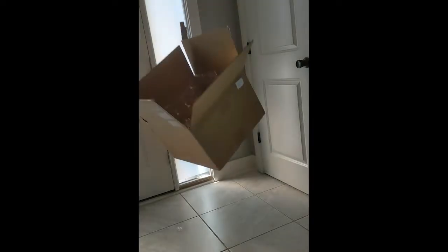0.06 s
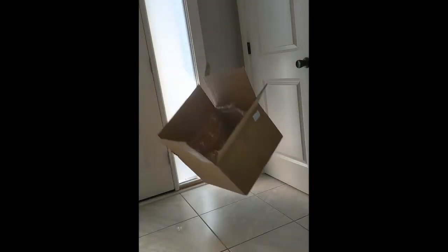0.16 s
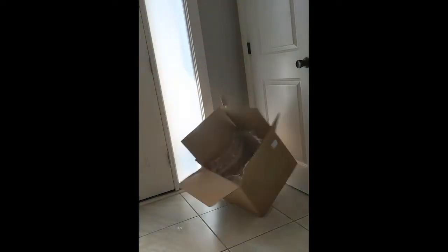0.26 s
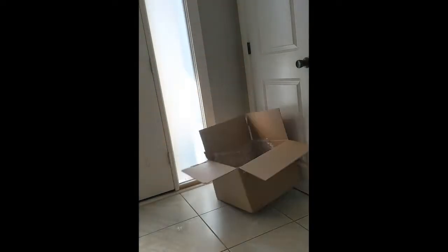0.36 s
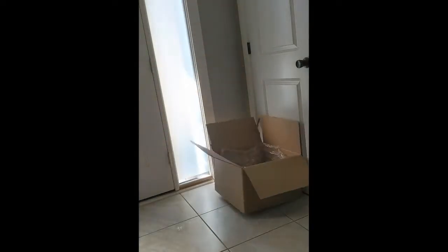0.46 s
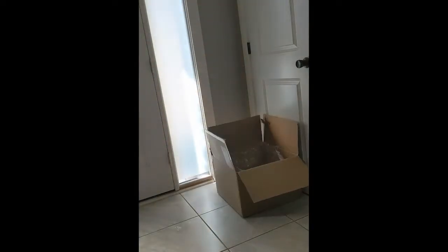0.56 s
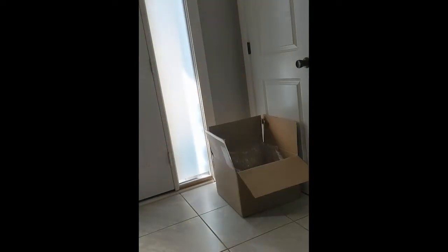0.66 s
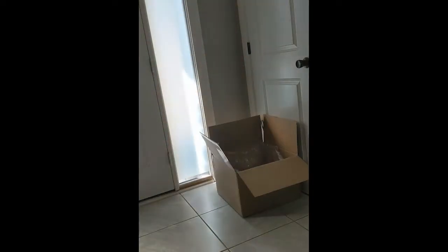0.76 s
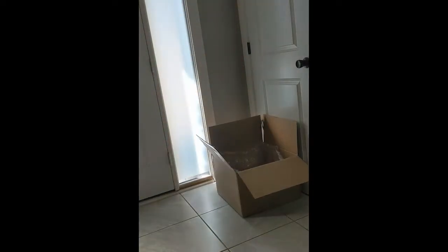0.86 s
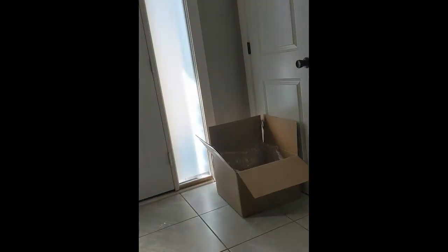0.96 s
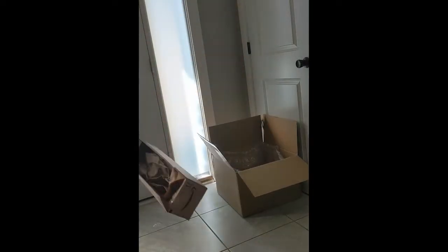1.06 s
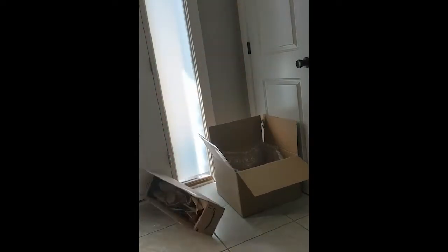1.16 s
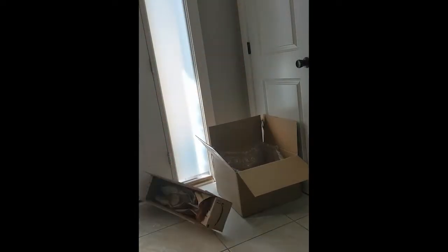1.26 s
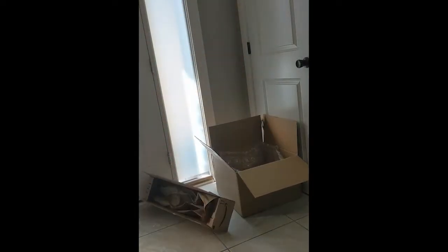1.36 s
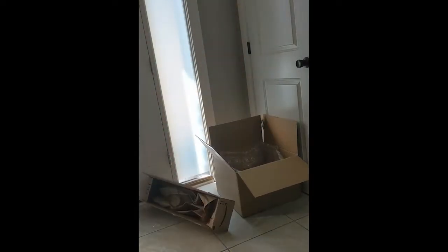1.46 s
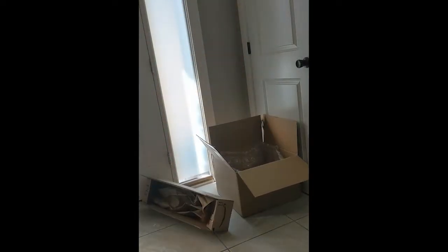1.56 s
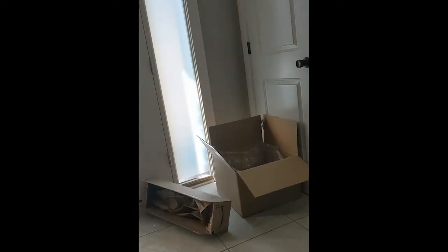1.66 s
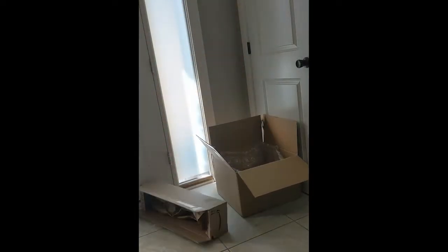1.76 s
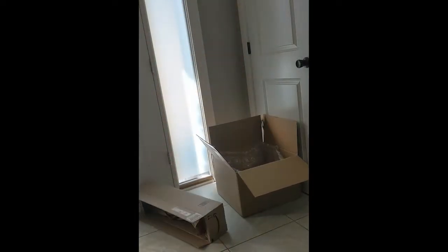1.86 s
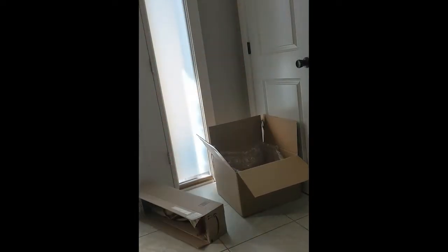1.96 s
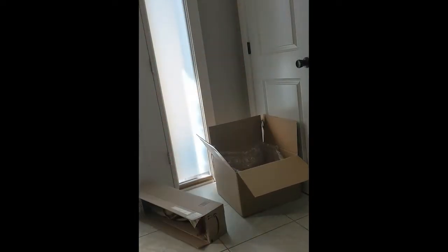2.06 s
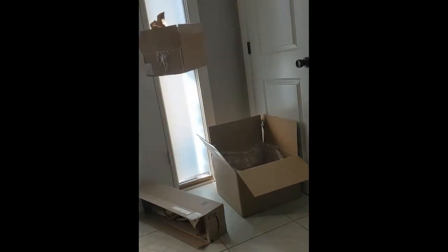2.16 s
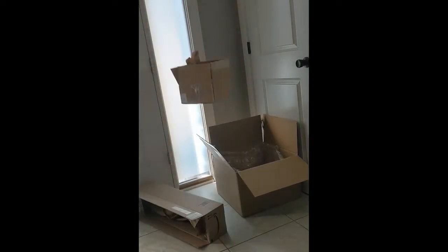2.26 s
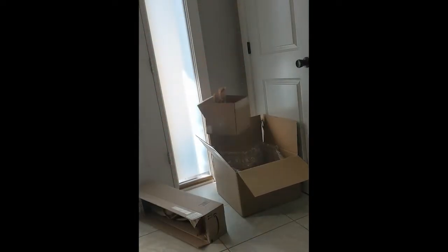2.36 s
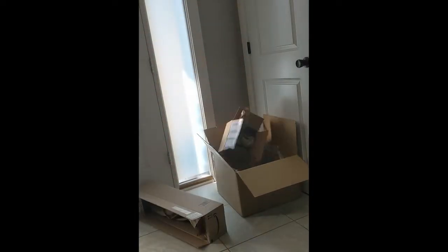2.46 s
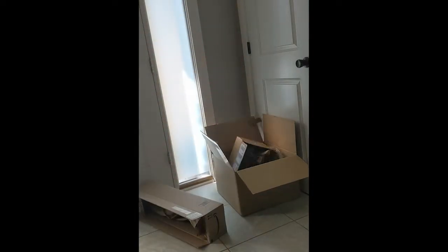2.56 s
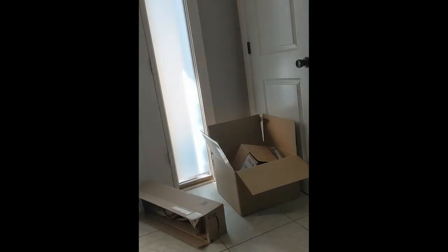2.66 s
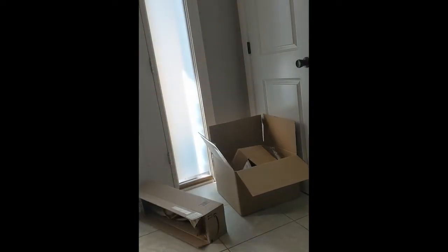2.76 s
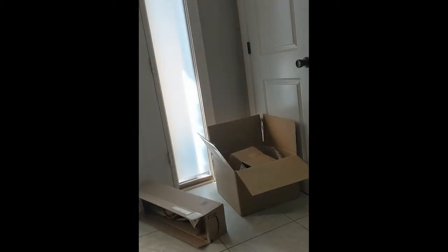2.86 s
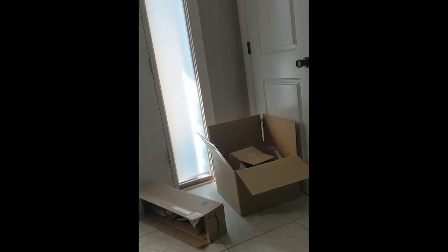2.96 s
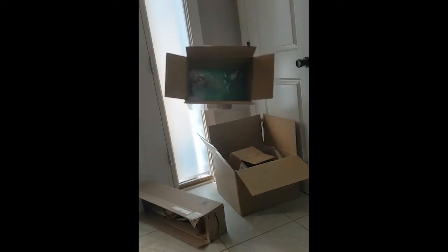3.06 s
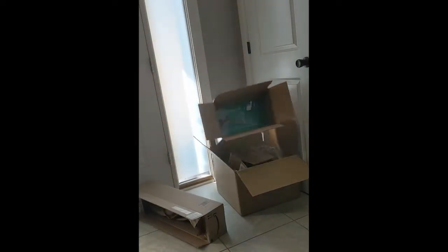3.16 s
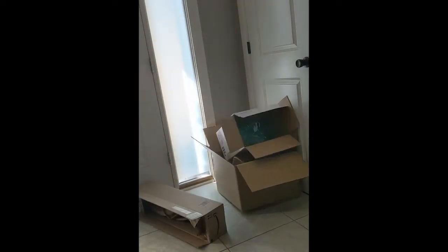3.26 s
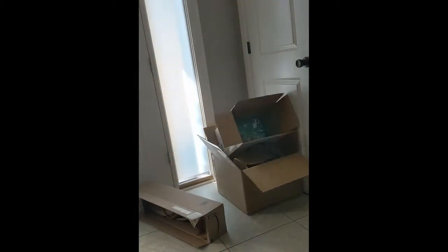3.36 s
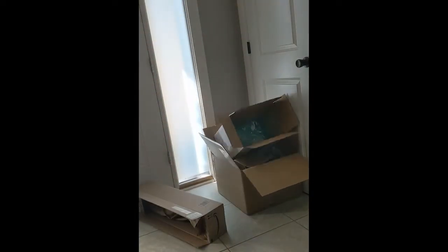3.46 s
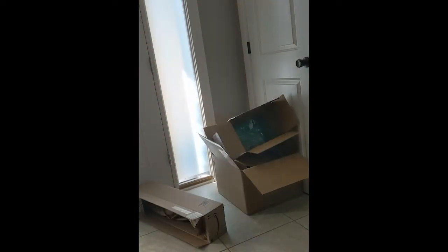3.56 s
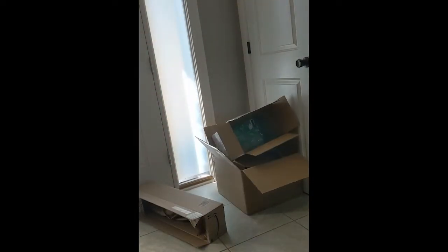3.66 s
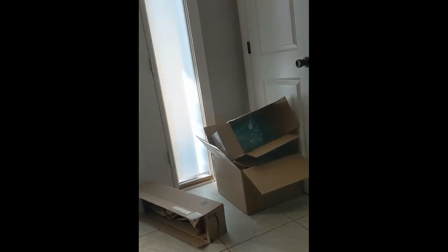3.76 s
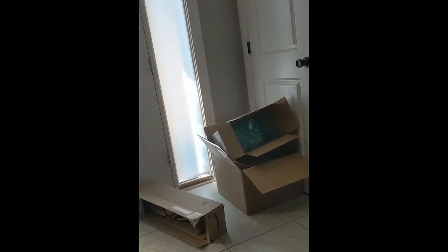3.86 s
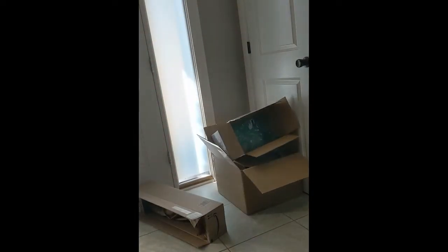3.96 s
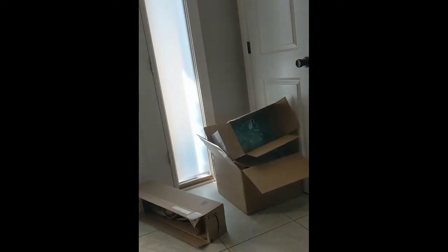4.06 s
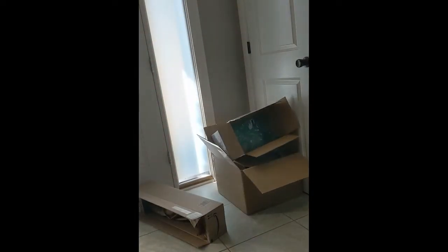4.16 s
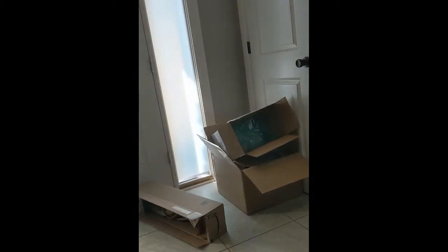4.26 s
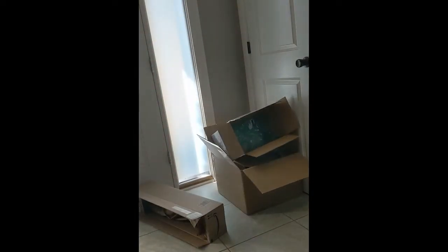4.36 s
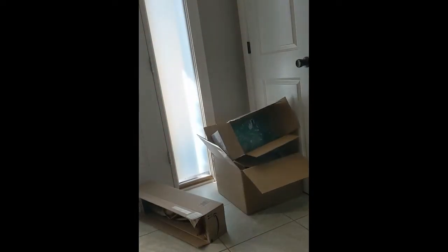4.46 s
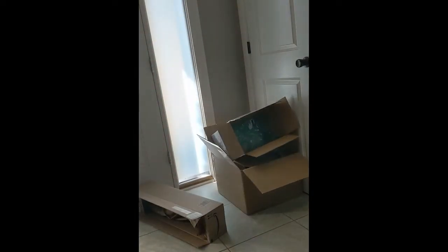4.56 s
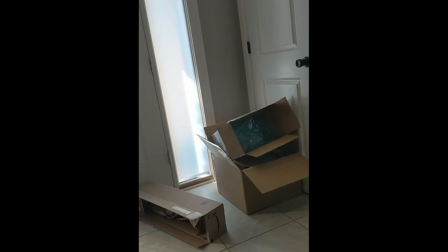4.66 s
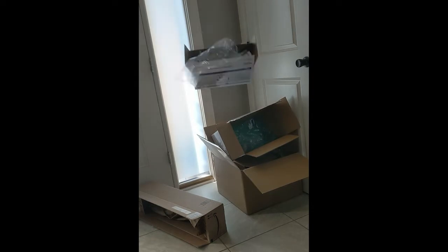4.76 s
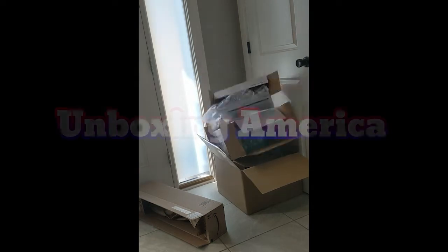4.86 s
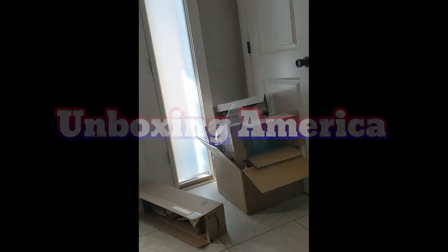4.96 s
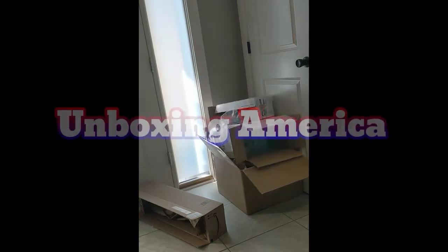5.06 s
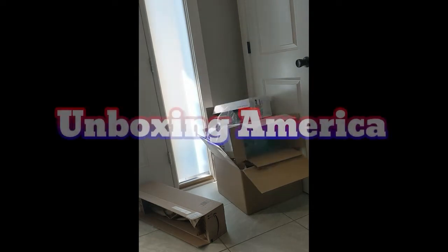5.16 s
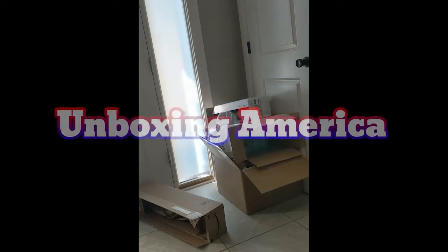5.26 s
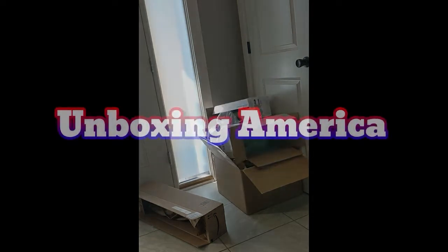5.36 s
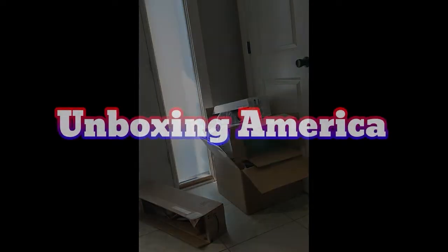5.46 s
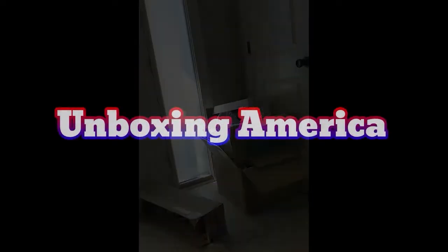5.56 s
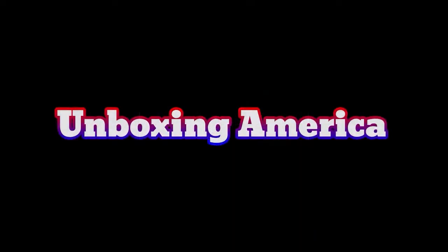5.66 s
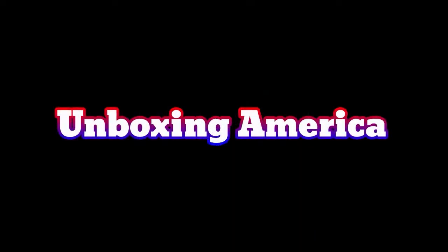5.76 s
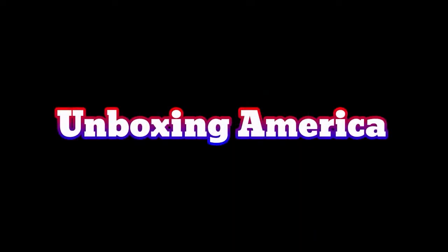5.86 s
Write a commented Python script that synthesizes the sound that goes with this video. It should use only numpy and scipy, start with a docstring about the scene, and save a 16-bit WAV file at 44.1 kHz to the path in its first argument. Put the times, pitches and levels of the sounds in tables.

```python
"""Cardboard boxes thrown in a bare hallway

Boxes land one after another on a tiled floor beside a door. Decaying sines ring the panels; shaped
grains and noise boom, crunch and rustle; paired low modes shudder the door; stiff film peels and rips.
Noise echoes follow. At section ends the rumble and hiss step and echoes stop; the end is near silent."""
import sys
import numpy as np
from scipy import signal
from scipy.fft import rfft, irfft, next_fast_len
from scipy.io import wavfile
from scipy.ndimage import uniform_filter1d, minimum_filter1d

SR = 44100
rng = np.random.default_rng(int(sys.argv[2]) if len(sys.argv) > 2 else 0)


def pcm_store(signal):
    """Save signal as 16-bit PCM."""
    levels = np.round(np.clip(np.atleast_2d(signal), -1, 1) * 32767)
    wavfile.write(sys.argv[1], SR, levels.astype(np.int16).T)


def level_to_linear(level):
    """Convert decibel levels to linear amplitude factors, elementwise."""
    exponent = np.asarray(level, float) / 20
    return 10 ** exponent


N = 260542

# Levels in the tables are relative, ahead of the mix. # Corners and faces meeting the floor; the 110 Hz row at
# 0.33 s is the air inside the big box booming. # Each row: start in seconds, ring level in dB, pitch in Hz
# (panel pitch, or air pitch for that row), # T60 at that pitch in seconds, crack level in dB.
BLOWS = [(0.329, -4.5, 233, 0.15, -5.5), (0.33, -5.5, 110, 0.24, -30), (0.342, -3, 225, 0.1, -9.5),
         (.556, -9.5, 283, 0.07, -15), (.565, -12, 157.5, .1, -24), (1.2447, -8.5, 260.4, .08, -17),
         (1.254, -8, 583, 0.2, -3.5), (1.279, -8.5, 433, 0.14, -7.5), (1.306, -8, 686, 0.06, -16.5),
         (1.342, -14.5, 616, 0.36, -15.5), (1.39, -17.5, 649, 0.35, -20), (1.953, -25.5, 228, 0.2, -38.5),
         (2.4633, -5.5, 403, 0.14, -9.5), (2.538, 0, 282, 0.1, -7.5), (2.549, -6, 273, .13, -26),
         (2.755, -24, 517, 0.14, -16.5), (3.285, -15.5, 253, 0.23, -29), (3.304, -2.5, 237.5, 0.12, -9.5),
         (3.342, -14, 301.5, 0.19, -1), (4.9059, -6.5, 242.6, 0.11, -26.5), (4.9516, -5, 1094, 0.052, -6),
         (4.961, -6.5, 337, 0.29, -13), (5.03, -13.5, 308, 0.32, -19)]
# Panel modes. Each row: multiple of the panel pitch, level in dB.
PANEL_MODES = [(0.471, -14.5), (1, -2), (1.449, -20.5), (2.199, -14)]
# A box lands, rocks or settles. Each row: start in seconds, crunch level in dB, boom against crunch in dB,
# hold in seconds, crunch T60 in seconds.
JOLTS = [(0.326, -17.5, 2.5, 0.0098, 0.57), (0.549, -32, 7, 0.02, 0.43), (1.241, -12.5, -6.5, 0.052, .6),
         (1.901, -38.5, 1.5, 0.032, 0.45), (2.031, -52.5, 11.5, 0.0145, 0.36),
         (2.463, -23, 4.5, 0.019, 0.27), (2.544, -23.5, 4, 0.013, 0.37), (2.746, -39, -2.5, 0.023, 0.63),
         (3.3, -21, 6, 0.024, 0.251), (3.328, -20, -3.5, .025, .43), (4.162, -35, -7.5, 0.039, 0.27),
         (4.907, -26.5, 6.5, 0.034, 0.51), (4.951, -14.5, -4.5, 0.02, 0.26), (5.061, -33, -3, 0.015, 1)]
# Packing and flaps stir. Each row: start in seconds, hold in seconds, level in dB, T60 in seconds.
STIRS = [(0, 0.1, -59, 0.2), (0.177, 0.011, -58, 0.11), (0.326, 0.0052, -23.5, 0.52),
         (0.434, 0.24, -45, 0.4), (1.243, 0.054, -22.5, 0.43), (1.89, 0.059, -45.5, 0.54),
         (2.463, 0.019, -33, 0.38), (2.552, 0.03, -35.5, 0.42), (2.673, 0.27, -51, 0.46),
         (3.294, 0.033, -29, 0.24), (3.334, 0.027, -25.5, 0.39), (3.678, 0.026, -52, 0.51),
         (3.848, .04, -60, .4), (4.903, 0.057, -36, 0.45), (4.948, .12, -33.5, 0.4),
         (5.245, 0.028, -50, 0.29)]
# Spectra of panel boom, corrugation crunch and packing rustle. Each row: frequency in Hz, gain in dB.
BOOM_GAIN_DB = [(90, -7), (201, 2), (348, -4), (500, -5), (650, -33), (1100, -120)]
CRUNCH_GAIN_DB = [(160, -10), (280, -3.5), (642, -1), (959, -4), (1240, -9.5), (1620, -12.5), (1980, -20),
                  (2600, -17), (3380, -32.5), (5720, -120)]
RUSTLE_GAIN_DB = [(1000, -20.5), (1700, -5), (2080, -10), (3250, -5), (11600, -16), (15400, -17),
                  (16500, -69.5)]
# Place of the sound and crispness of its packing. Each row: start in seconds, left minus right in dB,
# treble lift in dB.
PLACES = [(0, 0.5, 3), (1.099, 0.5, -7), (1.85, 1, -1), (2.399, 1, 5), (3.2, 0.5, 1), (3.955, -4, -3.5),
          (4.248, -0.5, -2), (4.68, -7.5, 2), (4.85, 1, 1.5)]
# Stiff film peeled gently, then in one rip. Each row: time in seconds, pull in dB, treble lift in dB.
PULL = [(3.961, -76, 10), (4.012, -54, 2), (4.076, -35.5, 4), (4.16, -35.5, 4.5), (4.214, -32, 0.5),
        (4.25, -35, 6), (4.252, -16.5, 5), (4.31, -8, 1.5), (4.341, -14, -1), (4.417, -16.5, 0.5),
        (4.435, -33.5, -11), (4.52, -49, -17), (4.68, -61, -3), (4.71, -57, 5.5), (4.785, -47.5, 1.5)]
# Spectrum of the cardboard under the film. Each row: frequency in Hz, gain in dB.
PEELED_BOARD_GAIN_DB = [(200, -4.5), (1000, 0.5), (1700, -8), (2500, -8), (4000, -30), (8000, -77)]
# Snaps of film letting go. Each row: start in seconds, level in dB.
SNAPS = [(4.015, -32.5), (4.027, -27), (4.047, -30.5), (4.064, -25), (4.1524, -24.5), (4.1585, -21.5),
         (4.1686, -15), (4.1758, -16), (4.1789, -15.5), (4.198, -11), (4.214, -16.5), (4.218, -13),
         (4.268, -4), (4.738, -33)]
# Stretched film sings. Each row: start in seconds, hold in seconds, pitch in Hz, level in dB.
SQUEALS = [(4.263, .024, 5560, -21.5), (4.327, 0.029, 3290, -21.5)]
# A flap rubs on the box. Each row: start in seconds, hold in seconds, level in dB.
CREAKS = [(3.686, .036, -46.5), (3.861, .035, -53.5)]
# Flap resonances. Each row: frequency in Hz, width in Hz, level in dB.
CREAK_TONES = [(467, 110, 3), (881, 58, 2.5), (1717, 71, -7)]
# Air and floor shocks reaching the door. Each row: start in seconds, leaf level in dB, side pane level in dB.
SHOVES = [(0.374, -17.5, -22.5), (1.252, -37, -49), (2.531, -36, -26.5), (3.304, -21.5, -26.5),
          (4.971, -20, -22.5)]
# Door modes. Each row: frequency in Hz, T60 in seconds, part (0 leaf, 1 side pane).
DOOR_MODES = [(28.5, 1.21, 0), (31.4, 0.85, 0), (58, 0.15, 1), (64.6, 0.85, 1), (44, 0.45, 1)]
# Hall decay. Each row: frequency in Hz, T60 in seconds.
HALL_T60_S = [(30, 2), (79, 0.77), (210, 0.48), (550, 0.64), (3840, 0.6), (10100, 0.49)]
# Likeness of left and right in hall and background. Each row: frequency in Hz, likeness from 0 to 1.
LIKENESS = [(60, 1), (250, 0.65), (600, 0.77), (3000, 0.029)]
# Sections of steady background. Each row: end in seconds, rumble level in dB, hiss level in dB.
SECTIONS = [(1.049, -57, -58), (2.205, -65, -64.5), (3.1, -55.5, -55), (3.952, -69.5, -63),
            (4.786, -61.5, -59), (5.519, -67, -56), (5.91, -101, -125)]
# Background spectrum. Each row: frequency in Hz, gain in dB.
BACKGROUND_GAIN_DB = [(12, -29), (20, -0.5), (53, -11.5), (244, -13), (1950, -25), (9410, -33),
                      (15200, -43.5), (16500, -60.5)]
# Level of the whole mix, lowered over the last throw. Each row: time in seconds, gain in dB.
FADE = [(5.101, -1), (5.52, -11)]
# Unequal microphones. Each row: frequency in Hz, left minus right in dB.
LEAN_DB = [(200, 1.5), (700, 6.5), (1200, -1.5), (9000, -1.5), (13000, 0.5)]
# Housing resonances round the microphones. Each row: frequency in Hz, width in Hz, lift in dB.
HOUSING = [(1580, 280, 5), (3570, 1600, 4.5), (5694, 370, 7.5), (7560, 430, 8), (9575, 700, 7.5),
           (11490, 140, 9)]

SHEEN_HZ, FILM_CUT_HZ, RUMBLE_HZ = 4770, 3320, 100
JOLT_RISE_S, STIR_RISE_S = 0.0011, 0.0034
JOLT_BLOOM, STIR_BLOOM = 0.17, 0.15   # rise time added, as a share of the hold
BOOM_T60_SHARE = 0.89   # of the crunch T60
RIP_S, SLIPS_PER_S, SLIP_DEPTH_DB, SLIP_WANDER_RAD = 4.2525, 126, 2, 0.031   # wander: random step per sample
PEEL_BOARD_DB, SNAP_BRIGHT_DB = -9, 3
CREAK_T60_S, SQUEAL_T60_S, SQUEAL_WIDTH_HZ = 0.36, 0.046, 830
HALL_DB, DRY_DB, BLOW_DRY_DB, BLOW_WET_DB = -6, -0.5, -3, -10
CEILING_DB, RECOVERY_DB_S = -1.8, 300


def rms_one(x):
    """Scale to rms 1."""
    return x / np.sqrt(np.mean(x ** 2) + 1e-20)


def at_hz(points, hz):
    """Read a table on a log-frequency axis."""
    points = np.array(points, float)
    return np.interp(np.log(hz + 1), np.log(points[:, 0] + 1), points[:, 1])


def high_pass(x, hz):
    """Keep what lies above hz."""
    return signal.sosfilt(signal.butter(2, hz, "high", fs=SR, output="sos"), x)


def brighten(x, gain):
    """Scale the treble above SHEEN_HZ by a gain, fixed or varying in time."""
    return x + (gain - 1) * high_pass(x, SHEEN_HZ)


def coloured(x, spectrum):
    """Give a signal a spectrum that falls away below its lowest point; rms 1."""
    size = next_fast_len(N)
    hz = np.fft.rfftfreq(size, 1 / SR)
    gain = level_to_linear(at_hz(spectrum, hz)) * np.minimum(hz / spectrum[0][0], 1) ** 4
    return rms_one(irfft(rfft(x, size) * gain, size)[:N])


def spread(mid, side, alike):
    """Left and right from mid and side noise: the less alike, the more side."""
    return np.sqrt(1 + alike) * mid + np.sqrt(1 - alike) * side * [[1], [-1]]


def grains(per_s, spread_db, smooth, spectrum, alike):
    """Random clicks of uneven size over smooth noise; a wide source reaches two microphones partly alike."""
    struck = rng.random(N) < per_s / SR
    sizes = level_to_linear(spread_db * np.minimum(rng.exponential(1, N), 4)) * struck
    layers = []
    for _ in range(2):
        clicks = rms_one(sizes * rng.choice([-1, 1], N))
        layers.append(coloured(clicks + smooth * rng.standard_normal(N), spectrum))
    return spread(*layers, alike) / np.sqrt(2)


def clumps(per_s, depth_db):
    """A gain that wanders at random: folds let go in bunches."""
    steps = rng.standard_normal(round(N / SR * per_s) + 2)
    wander = np.interp(np.arange(N) / SR * per_s, np.arange(len(steps)), steps)
    return rms_one(level_to_linear(depth_db * wander))


def swell(s, rise_s, hold_s, t60_s):
    """Rise towards 1; after the hold, die away by 60 dB per T60."""
    at = max(round(s * SR), 0)
    t = np.arange(min(N - at, 2 * SR)) / SR
    shape = (1 - np.exp(-t / rise_s)) * level_to_linear(-60 * (t - hold_s).clip(0) / max(t60_s, 0.01))
    return np.pad(shape, (at, N - at - len(t)))


def ring(hz, t60_s, size):
    """A sine that decays from height 1."""
    t = np.arange(size) / SR
    return np.sin(2 * np.pi * hz * t) * level_to_linear(-60 * t / t60_s)


def stereo_bands(size, shape):
    """Half-octave bands of stereo noise, scaled by shape(Hz), as alike as two close microphones hear them."""
    out, edges_hz = 0, 20 * 2 ** np.arange(0, 10.1, 0.5)
    white = rng.standard_normal((2, 2, size))
    for k, (low, high) in enumerate(zip(edges_hz, edges_hz[1:])):
        band = signal.butter(2, [low, high], "band", fs=SR, output="sos")
        mid, side = signal.sosfilt(band, white[k % 2])   # neighbours use separate noise
        centre_hz = np.sqrt(low * high)
        alike = np.clip(at_hz(LIKENESS, centre_hz), 0, 1)
        out = out + shape(centre_hz) * spread(mid, side, alike)
    return out


def blows():
    """Each blow rings the panel modes briefly and cracks for a few milliseconds."""
    box = np.zeros(N + SR)
    size = SR // 2
    t = np.arange(size) / SR
    give = 1 - np.exp(-t / 0.0005)   # cardboard yields: the ring takes a moment to build
    crack_decay = np.exp(-t / 0.0035)
    noise = coloured(rng.standard_normal(N), CRUNCH_GAIN_DB)
    for s, db, hz, t60_s, crack_db in BLOWS:
        at = round(s * SR)
        box[at:at + size] += level_to_linear(crack_db) / 2 * noise[at:at + size] * crack_decay
        for multiple, mode_db in PANEL_MODES:   # higher modes die sooner
            mode = ring(hz * multiple, max(t60_s, 0.01) / multiple, size)
            box[at:at + size] -= level_to_linear(db + mode_db) * give * mode
    return box[:N]


def jolts():
    """Each jolt drives panel boom and corrugation crunch; longer contacts build up more slowly."""
    boom = grains(400, spread_db=0.5, smooth=1.0, spectrum=BOOM_GAIN_DB, alike=0.79)
    crunch = grains(700, spread_db=1.0, smooth=0.87, spectrum=CRUNCH_GAIN_DB, alike=0.59)
    crunch = crunch * clumps(90, depth_db=1.5)
    booming, crunching = np.zeros((2, N))
    for s, db, boom_db, hold_s, t60_s in JOLTS:
        rise_s = JOLT_RISE_S + JOLT_BLOOM * hold_s
        crunching += level_to_linear(db) * swell(s, rise_s, hold_s, t60_s)
        booming += level_to_linear(db + boom_db) * swell(s, rise_s, hold_s, BOOM_T60_SHARE * t60_s)
    return boom * booming + crunch * crunching


def stirs(treble_db):
    """Packing and flaps rub in many fine contacts; longer stirs build up more slowly."""
    rustle = grains(2000, spread_db=0.0, smooth=0.94, spectrum=RUSTLE_GAIN_DB, alike=0.089)
    rustle = rustle * clumps(150, depth_db=1.0)
    stirring = sum(level_to_linear(db) * swell(s, STIR_RISE_S + STIR_BLOOM * hold_s, hold_s, t60_s)
                   for s, hold_s, db, t60_s in STIRS)
    return brighten(rustle, level_to_linear(treble_db)) * stirring


def stutter():
    """A gain that throbs once per jerk as the glue lets go; the jerks drift out of step."""
    wander = np.cumsum(rng.standard_normal(N)) * SLIP_WANDER_RAD
    since_rip_s = np.arange(N) / SR - RIP_S
    turn = 2 * np.pi * SLIPS_PER_S * since_rip_s + wander - wander[round(RIP_S * SR)]
    return rms_one(level_to_linear(SLIP_DEPTH_DB * np.cos(turn)))


def peel():
    """Film, too light to radiate lows, peels in jerks; a duller pull drags the board more."""
    film = grains(1800, spread_db=-1.0, smooth=1.3, spectrum=RUSTLE_GAIN_DB, alike=0.093)
    film = high_pass(film, FILM_CUT_HZ) * clumps(200, depth_db=3.5) * stutter()
    board = grains(1500, spread_db=5.0, smooth=0.96, spectrum=PEELED_BOARD_GAIN_DB, alike=0.23)
    t = np.arange(N) / SR
    s, pull_db, bright_db = np.transpose(PULL)
    pull = level_to_linear(np.interp(t, s, pull_db, -200, -200))
    bright = level_to_linear(np.interp(t, s, bright_db, 0, 0))
    return (brighten(film, bright) + level_to_linear(PEEL_BOARD_DB) * board / bright) * pull


def snaps():
    """Film letting go: a bright burst that swells and dies within two or three milliseconds."""
    marks = np.zeros(N)
    marks[[round(s * SR) for s, db in SNAPS]] = level_to_linear(np.array(SNAPS)[:, 1])
    t = np.arange(SR // 100) / (0.0004 * SR)   # in units of the 0.4 ms rise
    envelope = np.convolve(marks, t * np.exp(1 - t))[:N]
    burst = grains(2000, spread_db=5.5, smooth=12, spectrum=RUSTLE_GAIN_DB, alike=0.63)
    burst = high_pass(burst, FILM_CUT_HZ)
    return envelope / 2 * rms_one(brighten(burst, level_to_linear(SNAP_BRIGHT_DB)))


def squeals():
    """Stick and slip along the tear sounds one rough resonance of the taut film at a time."""
    slips = rng.standard_normal(N)
    out = 0
    for s, hold_s, hz, db in SQUEALS:
        peak = signal.iirpeak(hz, hz / SQUEAL_WIDTH_HZ, fs=SR)
        tone = rms_one(signal.lfilter(*peak, signal.lfilter(*peak, slips)))
        out = out + level_to_linear(db) * tone * swell(s, JOLT_RISE_S, hold_s, SQUEAL_T60_S)
    return out


def creaks():
    """Quick slips sound a few fixed resonances of the flap."""
    slips = rng.standard_normal(N)
    tones = 0
    for hz, width_hz, db in CREAK_TONES:
        peak = signal.iirpeak(hz, hz / width_hz, fs=SR)
        tones = tones + level_to_linear(db) * rms_one(signal.lfilter(*peak, slips))
    rubbing = sum(level_to_linear(db) * swell(s, JOLT_RISE_S, hold_s, CREAK_T60_S) for s, hold_s, db in CREAKS)
    return rms_one(tones) * rubbing


def door():
    """Close modes start opposed, so the shudder swells, fades and returns; it stops at the section end."""
    out, ends_s = np.zeros(N + SR), np.array(SECTIONS)[:, 0]
    for s, *part_db in SHOVES:
        at = round(s * SR)
        size = min(round((ends_s[ends_s > s][0] - s) * SR), SR)
        for k, (hz, t60_s, part) in enumerate(DOOR_MODES):
            out[at:at + size] += (-1) ** k * level_to_linear(part_db[round(part)]) * ring(hz, t60_s, size)
    return out[:N]


def hall():
    """Impulse response: noise that builds up in a few milliseconds and dies band by band."""
    t = np.arange(SR) / SR
    tail = stereo_bands(SR, lambda hz: level_to_linear(-60 * t / at_hz(HALL_T60_S, hz)))
    tail = tail * (1 - np.exp(-t / 0.0012))
    return level_to_linear(HALL_DB) * tail / np.sqrt(np.sum(tail ** 2) / 2)


def background():
    """Steady stereo noise split into rumble and hiss, each rms 1."""
    air = stereo_bands(N, lambda hz: level_to_linear(at_hz(BACKGROUND_GAIN_DB, hz)))
    rumble = signal.sosfilt(signal.butter(2, RUMBLE_HZ, fs=SR, output="sos"), air)
    return rms_one(rumble), rms_one(air - rumble)


def scene():
    """Section by section: sources, their echo cut off at the section end, and the background."""
    t = np.arange(N) / SR
    since_s, side_db, treble_db = np.transpose(PLACES)
    place = (np.searchsorted(since_s, t, "right") - 1).clip(0)
    pan = level_to_linear(np.outer([0.5, -0.5], side_db[place]))
    moving = jolts() + stirs(treble_db[place]) + peel() + creaks() + squeals()
    box, snap, echo = blows(), snaps(), hall()
    source = ((moving + snap).mean(axis=0) + level_to_linear(BLOW_WET_DB) * box) * pan
    direct = (level_to_linear(DRY_DB) * moving + level_to_linear(BLOW_DRY_DB) * box + snap) * pan + door()
    rumble, hiss = background()
    out, start = np.zeros((2, N)), 0
    for end_s, rumble_db, hiss_db in SECTIONS:
        end = min(round(end_s * SR), N)
        part = slice(start, end)
        wet = signal.fftconvolve(source[:, part], echo, axes=1)[:, :end - start]
        heard = hiss_db > -80   # the near-silent section has no sources
        out[:, part] = heard * (direct[:, part] + wet)
        out[:, part] += level_to_linear(rumble_db) * rumble[:, part] + level_to_linear(hiss_db) * hiss[:, part]
        start = end
    return out * level_to_linear(np.interp(t, *np.transpose(FADE)))


def band_limit(x):
    """A steep low-pass at the top of the band."""
    return signal.sosfilt(signal.butter(12, 16760, fs=SR, output="sos"), x)


def record(dry):
    """Unequal microphones, housing resonances, and a limiter that ducks just ahead of each peak."""
    size = next_fast_len(N)
    lean = level_to_linear(np.outer([0.5, -0.5], at_hz(LEAN_DB, np.fft.rfftfreq(size, 1 / SR))))
    dry = irfft(rfft(dry, size) * lean, size)[:, :N]
    for hz, width_hz, lift_db in HOUSING:
        peak = signal.iirpeak(hz, hz / width_hz, fs=SR)
        dry = dry + (level_to_linear(lift_db) - 1) * signal.lfilter(*peak, dry)
    over_db = np.maximum(20 * np.log10(np.abs(dry).max(axis=0) + 1e-9) - CEILING_DB, 0)
    ramp_db = RECOVERY_DB_S * np.arange(N) / SR
    held_db = np.maximum.accumulate(over_db + ramp_db) - ramp_db   # recovers at a steady rate
    duck_db = uniform_filter1d(-minimum_filter1d(-held_db, size=65), size=65)
    return band_limit(dry * level_to_linear(-duck_db))


dry = scene()
out = record(dry)
pcm_store(out)
```